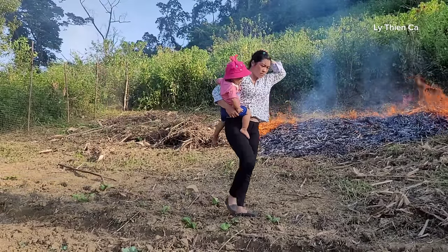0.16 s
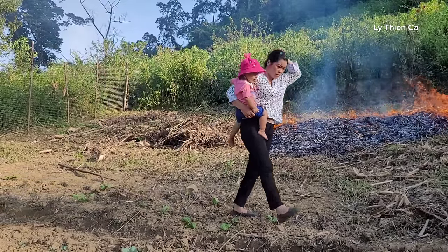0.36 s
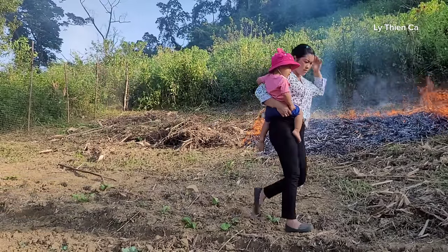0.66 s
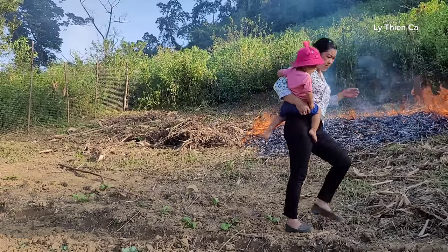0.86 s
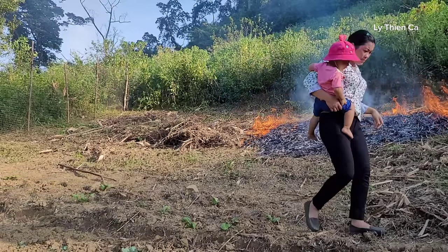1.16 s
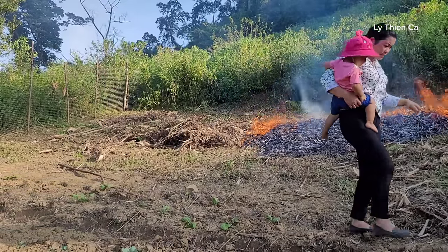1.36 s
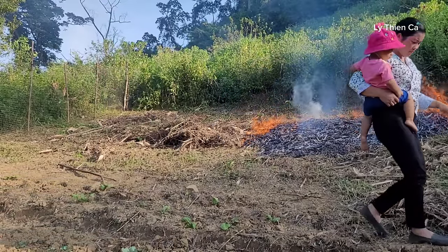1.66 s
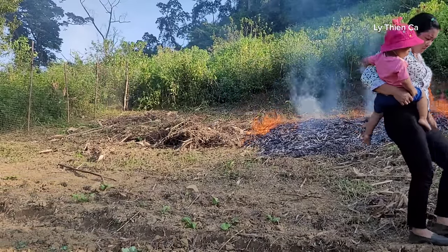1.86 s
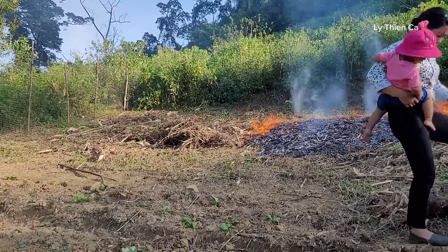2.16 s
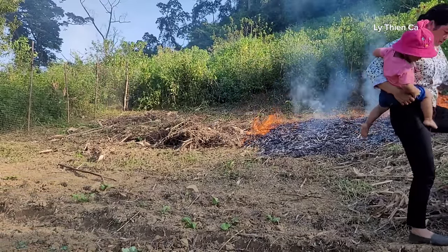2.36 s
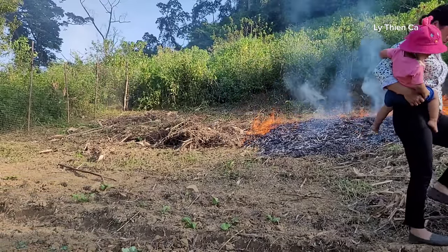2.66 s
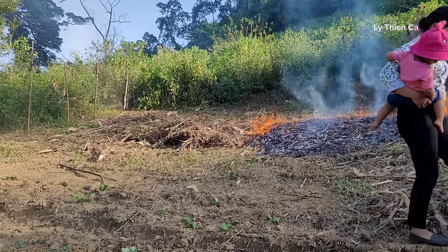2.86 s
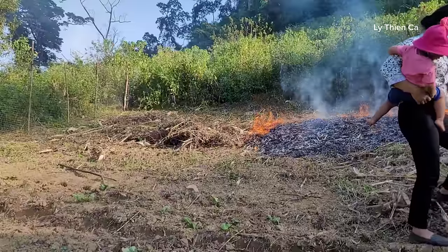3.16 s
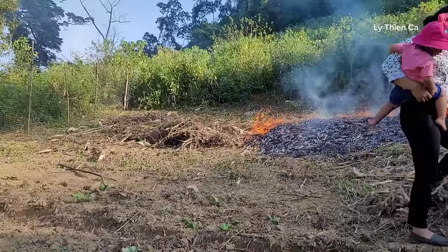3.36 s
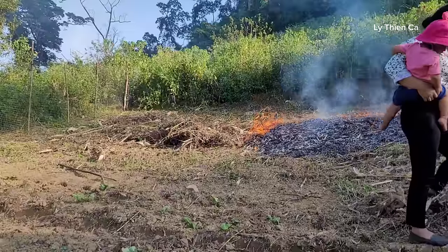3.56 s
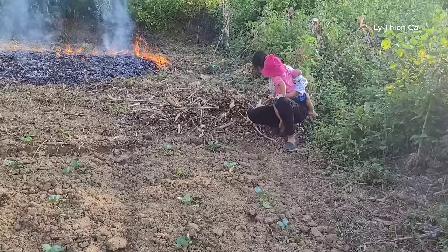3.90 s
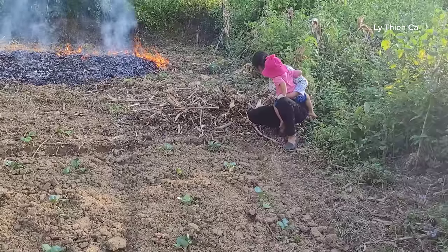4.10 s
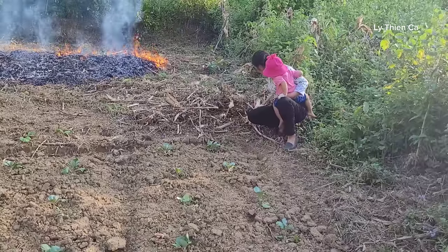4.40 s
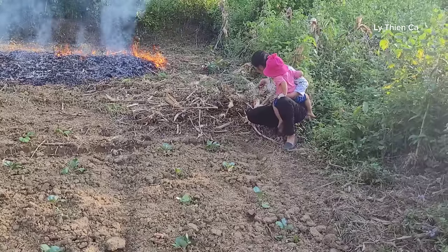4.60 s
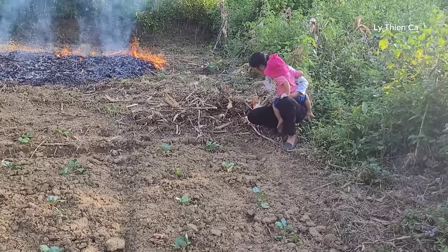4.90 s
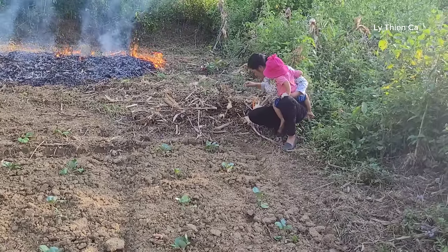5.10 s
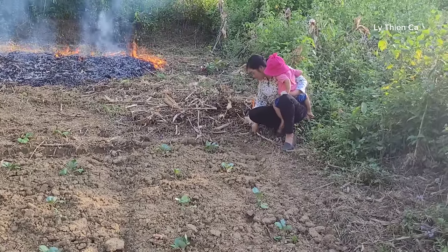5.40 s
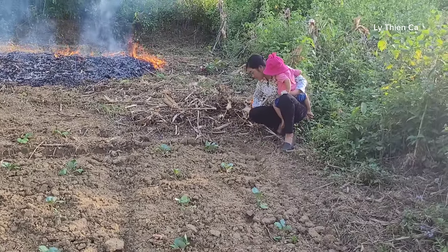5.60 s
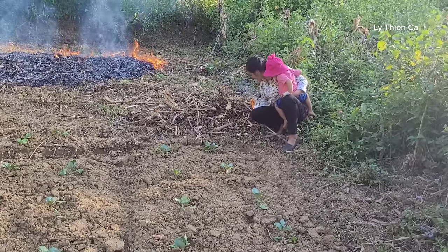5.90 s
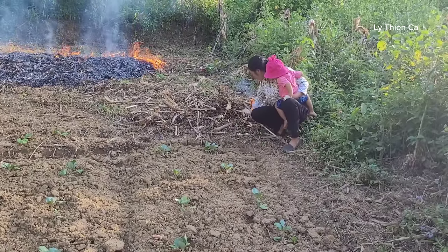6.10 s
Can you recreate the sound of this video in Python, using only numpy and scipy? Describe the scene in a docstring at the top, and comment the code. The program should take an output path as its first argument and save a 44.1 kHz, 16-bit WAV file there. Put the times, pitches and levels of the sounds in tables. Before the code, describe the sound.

Burning twigs spit bright dry pops and tiny needle-like ticks over a weak, wavering flame roar. Coarse footsteps scrape through brush close on the right, in two swishing, crunching drags, the second the loudest. After an abrupt cut the fire is heard from the left, quieter and sparser, with single sharp snaps, brief rustling and a gentle flare-up. Open air, little echo, faint constant treble hiss in a small two-port microphone.

```python
"""A pile of dry brush burns: twigs pop and snap as short resonant bursts, tiny ticks between them.
Leaves sizzle, stalks crunch and feet drag through, as grainy noise over a low flame roar and one flare-up.
The brush starts on the right, is heard from the left at 3.7 s, comes back to the right and ends on the left.
Two microphone ports a hand apart hear each sound at slightly different moments; a faint hiss lies below."""
import sys
import numpy as np
from scipy import signal
from scipy.io import wavfile

SR = 44100
rng = np.random.default_rng(int(sys.argv[2]) if len(sys.argv) > 2 else 0)


def master(y):
    """Save y as 16-bit WAV."""
    cut = np.clip(np.atleast_2d(y).T, -1, 1)
    pcm = np.round(cut * 32767)  # scale
    wavfile.write(sys.argv[1], SR, pcm.astype(np.int16))


N = 275625

# Fine dry flakes, the brightest part of the brush: (frequency [Hz], level [dB per Hz])
FLAKES = [(5400, -7), (6800, -0.5), (9000, -2.5), (11000, -1), (13500, 0), (16000, 0)]
# How directly a sound arrives: (frequency [Hz], share of the power that comes straight [0-1])
DIRECT = [(60, 0.9), (300, 0.96), (1000, 0.56), (2500, 0.42), (5000, 0.35), (12000, 0.083)]
# Near port over far port for a sound at full side: (frequency [Hz], level difference [dB])
SHADOW = [(200, -0.2), (1000, 3), (4000, 1.5), (15000, 4.5)]
FULL_SIDE_US = 270   # delay between the ports that counts as full side [us]


def amp(db):
    """Decibels to gain."""
    return 10 ** (np.asarray(db) / 20)


def rms_one(x):
    """Scale to unit rms."""
    return x / np.sqrt(np.mean(x ** 2) + 1e-20)


def in_time(rows):
    """Columns of a table joined by straight lines, one value a sample."""
    s, *columns = np.transpose(rows)
    return [np.interp(np.arange(N) / SR, s, c) for c in columns]


def at_hz(points, hz):
    """Read a spectrum on a log frequency axis."""
    return np.interp(np.log(hz), np.log(np.array(points)[:, 0]), np.array(points)[:, 1])


def drift(rate):
    """Slow random wander of unit rms: noise through two equal low-pass poles at rate [Hz]."""
    step = 40   # computed at every 40th sample, then joined by lines
    r = np.exp(-2 * np.pi * rate * step / SR)
    noise = rng.standard_normal(N // step + 2002)
    slow = signal.lfilter([1], [1, -2 * r, r * r], noise)[2000:]   # skip the filter's start
    return np.interp(np.arange(N) / step, np.arange(len(slow)), rms_one(slow))


def resonance(x, hz, width_hz):
    """Two-pole resonance, gain about 1 at its peak."""
    r = np.exp(-np.pi * width_hz / SR)
    poles = [1, -2 * r * np.cos(2 * np.pi * hz / SR), r * r]
    return signal.lfilter([(1 - r * r) / 2, 0, (r * r - 1) / 2], poles, x)


def crackle(per_s, spread_db, grain_s, share):
    """Envelope of clumped tiny breaks holding a share of the power over a smooth bed, mean power 1."""
    born = rng.random(N) < per_s * amp(5 * drift(15)) / SR   # the break rate wanders, so breaks clump
    power = born * amp(2 * spread_db * np.minimum(rng.exponential(1, N), 4.5))
    grains = signal.lfilter([1], [1, -np.exp(-1 / (grain_s * SR))], power + 1e-18)
    return np.sqrt(share * grains / grains.mean() + 1 - share)


def placed_noise(spectrum, envelope, late_us, patchy_db, flicker):
    """Noise in 0.4-octave bands: a straight part that reaches one port late, and scatter of its own at each."""
    low, high = spectrum[0][0], spectrum[-1][0]
    edges = np.geomspace(low, high, int(2.5 * np.log2(high / low)) + 2)
    white = rng.standard_normal((2, 3, N)) * envelope   # two sets, used by alternate bands
    t = np.arange(N)
    lag = np.round(late_us * 1e-6 * SR).astype(int)
    late_index = np.clip(t - lag, 0, N - 1)
    straight = np.array([[w[0][late_index], w[0]] for w in white])
    scattered = white[:, 1:]
    side = np.array([-late_us, late_us]) / FULL_SIDE_US / 2
    out = 0
    for k, (a, b) in enumerate(zip(edges, edges[1:])):
        hz = np.sqrt(a * b)
        direct = at_hz(DIRECT, hz)
        mixed = np.sqrt(direct) * straight[k % 2] + np.sqrt(1 - direct) * scattered[k % 2]
        band = signal.sosfilt(signal.butter(2, [a, b], "band", fs=SR, output="sos"), mixed)
        level_db = at_hz(spectrum, hz) + patchy_db * drift(flicker) + at_hz(SHADOW, hz) * side
        out = out + band * amp(level_db)
    return rms_one(out)


def pops(bearing_us):
    """Each pop: a bright crack of bursting sap, a woody knock, then a spatter of fragments that dies away."""
    # Pops and snaps: (time [s], crack level [dB], crack frequency [Hz], knock level [dB],
    # knock frequency [Hz], knock sharpness [ratio], spatter against the initial noise burst [dB])
    pop_rows = [(.045, -25, 7350, -78, 1820, .5, -10.5), (.051, -28.5, 7500, -47.5, 685, .66, -10),
                (.191, -46, 4050, -37.5, 496, .45, -8), (.284, -39, 11900, -65, 650, .6, -7),
                (.305, -35, 9800, -59, 1200, 0.43, -11), (.329, -45, 12700, -57, 1050, 1.5, -7),
                (.358, -39.5, 7100, -51, 1040, 0.83, -13), (.485, -34.5, 11700, -55, 1490, .78, 1),
                (.684, -44, 12800, -67, 410, .6, -15), (.92, -29.5, 11400, -53, 840, .5, -13),
                (.933, -17, 12300, -43.5, 880, 0.55, -18.5), (.9357, -12, 13400, -34.5, 860, 0.75, -21),
                (1.056, -32, 8900, -46, 776, 1.5, -11), (1.127, -31.5, 12200, -47.5, 400, 0.86, -5),
                (1.151, -28, 13500, -50, 790, .5, -10), (1.213, -31, 11900, -55, 420, .5, -12),
                (1.266, -32.5, 10300, -72, 490, .5, -12), (1.325, -28.5, 12100, -71, 780, .5, -19),
                (1.417, -39, 3550, -30.5, 1120, 0.32, -18), (1.423, -34, 13000, -57, 650, 0.54, -9),
                (1.473, -44, 11700, -46, 710, 0.3, -30), (1.504, -25.5, 11900, -41, 1600, 0.43, -21),
                (1.623, -19.5, 8900, -71, 1380, .58, -33), (1.731, -33, 4600, -29.5, 2040, 9.3, -13),
                (1.786, -55, 11100, -31.5, 570, 0.69, -6), (1.869, -11.5, 9700, -39, 1600, .5, -23),
                (1.882, -15, 7500, -46, 1760, .54, -30), (1.898, -30, 7300, -20, 1210, 1.04, -30),
                (1.973, -25, 9500, -32, 1870, .5, -21), (2.037, -13, 5930, -34, 2010, 0.5, -14),
                (2.055, -27, 11000, -16.5, 2360, 0.48, -17), (2.07, -33, 8700, -22, 690, 0.79, -20),
                (2.147, -21, 8950, -23.5, 680, 0.23, -23), (2.235, -41, 7700, -35, 1160, 0.3, -28),
                (2.308, -22, 6000, -22, 1400, 2.2, -26), (2.447, -34, 7500, -41, 1170, .5, -21),
                (2.456, -38, 7500, -31.5, 1080, 0.84, -30), (2.625, -40, 8700, -32.5, 1080, 1.6, -6),
                (2.648, -38, 5000, -33, 330, .6, -10), (2.712, -30, 11100, -35.5, 1480, 0.87, -3),
                (2.736, -22.5, 12000, -31.5, 1360, .24, 10), (2.834, -36.5, 9700, -57, 1810, .7, -8),
                (2.863, -47, 6700, -37.5, 1370, 1.5, -30), (2.9, -19, 5400, -44, 1470, 1.1, -2),
                (2.908, -16, 6400, -40, 1660, 3, -16), (2.927, -12, 6900, -46, 2060, .5, -40),
                (2.973, -23, 9200, -22, 1370, 0.85, -34), (2.9932, -5.5, 9850, -25, 2100, 1.6, -11),
                (2.9985, -11, 9150, -21, 1400, 4, 1), (3.058, -19, 5800, -19, 2120, 0.86, -10),
                (3.27, -27, 10300, -27.5, 706, .35, -26), (3.422, -30, 6900, -28, 1210, 0.82, -30),
                (3.491, -39, 7100, -34, 1130, 1.3, -25), (3.535, -32, 10200, -61, 1030, .5, -26),
                (3.59, -29.5, 7800, -39, 1050, 1.1, -24), (3.826, -25.5, 5460, -31, 940, .35, -18.5),
                (3.844, -17.5, 11200, -34.5, 1390, 0.26, -29), (3.988, -59, 4400, -19.5, 950, 0.29, -19),
                (4.074, -40, 9400, -60, 2020, .7, -6), (4.228, -41, 9800, -70, 1720, .5, -4),
                (4.251, -29, 11800, -68, 1340, .5, -24), (4.2652, -9.5, 11900, -31, 2750, 1.5, -26),
                (4.34, -46, 12000, -68, 480, .5, -30), (4.353, -32, 11800, -59, 1120, .56, -15),
                (4.392, -31, 10700, -43.5, 1820, 1.1, -17), (4.551, -37.5, 4800, -44.5, 1440, 1.2, -16),
                (4.593, -30.5, 6000, -38.5, 1880, .37, -12), (4.676, -37, 10100, -44, 2470, 2, -17),
                (4.984, -46, 11700, -78, 470, .5, -12), (5.0, -40, 11600, -63.5, 780, 0.44, -21),
                (5.018, -37, 10600, -49, 2300, 0.52, -13), (5.089, -31.5, 13800, -69, 1280, .43, -16),
                (5.14, -31.5, 10800, -45.5, 1700, 0.38, -20), (5.166, -39, 11200, -52, 1880, 0.46, -14),
                (5.288, -44, 6000, -60, 1710, .9, -22), (5.304, -30, 5500, -39.5, 1040, .77, -18),
                (5.339, -37, 12400, -51, 1390, .5, -8), (5.363, -38, 6800, -39, 1230, .27, -13),
                (5.471, -39, 10600, -58, 660, .77, -12), (5.524, -30.5, 10900, -70, 1770, .5, -9),
                (5.536, -32, 12300, -61, 2180, .6, -15), (5.56, -40, 10100, -57, 1990, .5, -14),
                (5.579, -28.5, 5040, -32.5, 710, 0.24, 1), (5.616, -32, 6150, -51, 2310, 0.79, -14),
                (5.69, -29.5, 9500, -68, 620, .5, -18), (5.739, -23.5, 10300, -39, 2500, 5.6, 8),
                (5.773, -35.5, 11500, -56, 2240, .8, -8), (5.804, -25.5, 9500, -71, 2500, .5, -4),
                (5.815, -24, 8000, -69, 1930, .45, -21), (5.928, -34, 11200, -54, 2170, .55, -6),
                (5.945, -36.5, 13100, -74, 510, .5, -19.5), (6.017, -41.5, 6000, -75, 1080, .5, -17),
                (6.133, -37, 12800, -70, 390, .97, -23), (6.202, -33, 6800, -41, 1310, .24, -12)]
    scatter = 0.82   # a pop comes from one spot: share of the usual scatter that is left
    length = 2048
    out, t = np.zeros((2, N + 2 * length)), np.arange(length) / SR
    rows = list(pop_rows) + small_pops()
    draws = rng.standard_normal((len(rows), 6, length))
    first = t == 0
    for (s, crack_db, crack_hz, knock_db, knock_hz, sharpness, spatter_db), d in zip(rows, draws):
        late_us = bearing_us[int(s * SR)]
        spatter = amp(spatter_db) * (np.exp(-t / 0.0065) + 2.8 * np.exp(-t / 0.0018))
        burst = 3 * first + d[:3] * (np.exp(-t / .0001) + spatter)
        bright = resonance(burst, crack_hz, 0.27 * crack_hz)
        edge = signal.lfilter([1, -1], [1, -np.exp(-np.pi * crack_hz / SR)], burst)
        bright = bright + 0.3 * edge   # the edge reaches the top of the treble
        # a crack has no body
        bright = signal.sosfilt(signal.butter(2, 0.28 * crack_hz, "high", fs=SR, output="sos"), bright)
        blow = np.exp(-t / .0001) + .35 * d[3:] * np.exp(-t / .002)
        sharpness = max(sharpness, .3)
        woody = resonance(blow, knock_hz, 0.66 * knock_hz / sharpness)
        woody = woody + 0.18 / sharpness * resonance(blow, 230, 660)   # dull knocks carry a low thud
        for port, sign in enumerate((1, -1)):
            at = round((s + sign * late_us * 1e-6 / 2) * SR)
            for sound, db, hz in ((bright, crack_db, crack_hz), (woody, knock_db, knock_hz)):
                direct = 1 - scatter * (1 - at_hz(DIRECT, hz))
                mixed = np.sqrt(direct) * sound[0] + np.sqrt(1 - direct) * sound[1 + port]
                shade_db = -sign * late_us / FULL_SIDE_US / 2 * at_hz(SHADOW, hz)
                out[port, at:at + length] += amp(db + shade_db) * mixed / np.abs(mixed).max()
    return out[:, :N]


def small_pops():
    """Fainter pops at random moments, with the same columns as the table in pops()."""
    count = 30
    crack_db, spread_db, crack_hz = -45.5, 8, 11000
    knock_db, knock_hz = -60, 870
    spatter_db = -12.5
    when = rng.random(count) * (N / SR - .1)
    chance = np.clip(rng.standard_normal((count, 5)), -1.5, 1.5)
    return [(s, crack_db + spread_db * a, crack_hz * np.exp(.15 * b), knock_db + 6 * c,
             knock_hz * np.exp(.5 * e), .6, spatter_db + 6 * f)
            for s, (a, b, c, e, f) in zip(when, chance)]


def ticks(late_us):
    """Sparse needle-sharp ticks of small sap pockets all over the pile: flake noise in sub-ms decays."""
    born = rng.random(N) < 45.0 * amp(4 * drift(4)) / SR   # 45 a second where the drift is zero
    power = born * amp(2 * 2.8 * np.minimum(rng.exponential(1, N), 3.5))
    envelope = np.sqrt(signal.lfilter([1], [1, -np.exp(-1 / (0.00034 * SR))], power + 1e-18))
    return amp(-75.0) * placed_noise(FLAKES, envelope, late_us, patchy_db=4.5, flicker=20)


def brush(late_us, roar_db):
    """Leaves and flakes hiss in fine grains, stalks crunch in coarser ones, soil shifts below."""
    # Colours of leaves, stalks and soil: (frequency [Hz], level [dB per Hz])
    leaf_colour = [(2100, -6), (2600, -11.5), (3300, -1.5), (4500, -3), (5800, -6), (7400, -15)]
    stalk_colour = [(380, -7.5), (520, -12), (720, -4.5), (920, -6), (1270, -3), (1700, -10.5), (2200, 1.5),
                    (3000, -50)]
    soil_colour = [(110, -16), (170, -7), (270, 1), (370, -1), (480, -21.5), (650, 1)]
    leaves_gain, flakes_gain, stalks_gain, soil_gain = brush_levels(roar_db)
    breaks = crackle(per_s=390, spread_db=3.5, grain_s=0.0015, share=0.37)
    crunch = crackle(per_s=240, spread_db=7.0, grain_s=0.0049, share=0.65)
    leaves = placed_noise(leaf_colour, breaks, late_us, patchy_db=1.3, flicker=20)
    flakes = placed_noise(FLAKES, breaks, late_us, patchy_db=2.0, flicker=5.8)
    stalks = placed_noise(stalk_colour, np.sqrt(breaks * crunch), late_us, patchy_db=2.5, flicker=8.3)
    # only loud soil is lumpy: smooth below -65 dB, fully grainy from -51 dB
    underfoot = np.clip((20 * np.log10(soil_gain) + 65) / 14, 0, 1)
    soil = placed_noise(soil_colour, crunch ** underfoot, late_us, patchy_db=1.5, flicker=6.8)
    return leaves_gain * leaves + flakes_gain * flakes + stalks_gain * stalks + soil_gain * soil


def brush_levels(roar_db):
    """Gains of leaves, flakes, stalks and soil: sizzle, foot drags and stirs add in power."""
    # Sizzle of the burning brush throughout: (time [s], leaves [dB], flakes over the leaves [dB])
    sizzle = [(0, -77, 16), (.2, -79, 9), (.55, -72.5, 13), (.76, -88, 17), (.88, -92, 20), (1.04, -79, 5),
              (1.14, -68, 9), (1.35, -74.5, 15.5), (1.77, -77.5, 10), (2.88, -70, 4), (3.71, -76, 10.5),
              (3.73, -79, 15.5), (3.81, -97, 15), (3.96, -64.5, 5), (4.23, -69, 9), (4.48, -72.5, 7.5),
              (4.6, -65, 5.5), (4.725, -65, 10), (4.773, -79, 13), (4.98, -96, 22), (5.03, -71.5, 13),
              (5.276, -78.5, 5), (5.45, -73.5, 12.5), (5.85, -71.5, 12), (6.18, -75.5, 12), (6.25, -67, 1)]
    # A foot drags through the brush, one table a drag: (time [s], leaves level [dB])
    drags = [
        [(1.796, -70), (1.812, -46.5), (1.868, -36.5), (1.94, -44.5), (1.975, -39.5), (2.01, -42), (2.051, -36),
         (2.235, -45.5), (2.323, -47.5), (2.363, -50), (2.466, -50.5), (2.522, -55), (2.626, -55), (2.674, -51),
         (2.69, -63.5), (2.8, -71), (2.88, -75)],
        [(2.893, -57), (2.908, -36), (2.985, -41.5), (3.081, -39), (3.304, -54.5), (3.384, -44), (3.416, -45.5),
         (3.472, -57), (3.536, -61.5), (3.584, -60), (3.712, -59), (3.728, -71.5)],
    ]
    # Brush shifts and settles: (time [s], leaves [dB], flakes over the leaves [dB], stalks [dB],
    # soil [dB], time to fall 20 dB [s])
    stirs = [(0.049, -60.5, 4, -75, -73, .12), (.223, -76, 15, -68.5, -73, .2),
             (.479, -77.5, 18, -67.5, -82, 0.36), (.567, -71.5, 11, -75, -82, 0.3),
             (.9, -73, 12, -60.5, -75, 0.43), (.934, -65.5, 23, -55.5, -62, 0.11),
             (0.972, -62, 10, -59.5, -58, 0.21), (1.427, -71, 10, -64.5, -68, 0.16),
             (1.509, -63, 6, -66, -71, .12), (1.636, -69, 10.5, -69.5, -77, 0.7),
             (1.794, -70, 5, -57, -54.5, 0.5), (2.659, -59, 14, -47, -39, 0.04),
             (2.673, -44, 5, -47.5, -58, 0.03), (2.737, -63, 14.5, -63.5, -69.5, .25),
             (2.999, -34.5, 4, -35.5, -41.5, 0.0738), (3.841, -54, 1.5, -53.5, -71, 0.07),
             (3.99, -67, 4, -61, -65.5, 0.32), (4.262, -65.5, 4.5, -68, -85, 0.28),
             (4.398, -68, 16, -78, -86, 0.03), (4.606, -73, 0, -63, -66, 0.02),
             (5.307, -61, 9, -63, -62, 0.08), (5.356, -59, -1, -68.5, -72, 0.1),
             (5.529, -59, 9, -69, -75, 0.2), (5.573, -52, 8.5, -60, -67, 0.06),
             (5.627, -53.5, -6, -64, -66, 0.02), (5.747, -65, 8.5, -74, -67, 0.17),
             (5.811, -66.5, 0, -87, -73, 0.38)]
    drag_offsets_db = [[0], [5.5], [-4.0], [-10.5]]   # leaves, flakes, stalks, soil over the leaves
    stir_rise_s = 0.018   # to rise 20 dB
    bed_db, fine_db = in_time(sizzle)
    stalks_db = -78.5 + 0.45 * (bed_db + 71.5)   # stalks follow 0.45 of the leaves' swing
    embers_db = roar_db - 9   # low murmur of the embers, under the roar
    power = amp([bed_db, bed_db + fine_db, stalks_db, embers_db]) ** 2
    t = np.arange(N) / SR
    for drag in drags:
        during = (t > drag[0][0]) & (t < drag[-1][0])
        power += during * amp(in_time(drag)[0] + drag_offsets_db) ** 2
    for s, leaves_db, flakes_db, stalks_db, soil_db, fall_s in stirs:
        near = slice(max(int((s - .1) * SR), 0), int((s + .6) * SR))
        shape_db = -20 * np.maximum((s - t[near]) / stir_rise_s, (t[near] - s) / fall_s)
        peaks_db = [[leaves_db], [leaves_db + flakes_db], [stalks_db], [soil_db]]
        power[:, near] += amp(shape_db + peaks_db) ** 2
    return np.sqrt(power)


def housing(sound, late_us):
    """Sound from the right passes the body that holds the ports and takes on its peaks and hollows."""
    # Resonances of the body, in series: (frequency [Hz], width [Hz], gain added at the peak [ratio])
    body_modes = [(620, 1000, -0.071), (891, 102, -0.88), (1193, 130, 0.52), (1700, 1300, -0.15),
                  (2080, 140, -0.017), (2360, 320, -0.66), (3260, 195, 0.52)]
    coloured = sound
    for hz, width_hz, gain in body_modes:
        coloured = coloured + gain * resonance(coloured, hz, width_hz)
    from_right = np.clip(late_us / FULL_SIDE_US, 0, 1)
    return sound + from_right * (coloured - sound)


def flame_roar(late_us, roar_db):
    """Low, slowly wavering noise of the burning gas."""
    # Colour of the flames: (frequency [Hz], level [dB per Hz])
    flame_colour = [(25, -27), (35, -8.5), (60, -1.5), (100, -6), (150, -6), (220, -17), (320, -7)]
    noise = placed_noise(flame_colour, 1, late_us, patchy_db=2.36, flicker=1.6)
    return amp(roar_db + 2.9 * drift(3.3)) * noise


def flare():
    """A soft mid-range whoosh on the left as fresh twigs catch: banded noise that swells and fades."""
    # Swell of the flare-up: (time [s], level [dB])
    swell = [(5.3, -92), (5.342, -89), (5.5, -68.5), (5.65, -70.5), (5.912, -78), (6.25, -82.5)]
    # Colour of the whoosh: (frequency [Hz], level [dB per Hz])
    whoosh_colour = [(300, -2), (400, 12.5), (600, -8), (800, 8), (1000, -7)]
    level_db, = in_time([(swell[0][0] - .1, -120)] + list(swell))
    left_us = np.full(N, -120.)   # the left port hears it 120 us early
    return amp(level_db) * placed_noise(whoosh_colour, 1, left_us, patchy_db=3.5, flicker=10)


def steady_hiss():
    """A broad faint hiss of high-passed noise, and a narrow treble band that flickers slightly."""
    # Level of the narrow band at each port: left [dB], right [dB]
    band_db = [-94, -72]
    band_hz, band_width_hz = 7460, 830
    white = rng.standard_normal((2, 2, N))
    broad = signal.sosfilt(signal.butter(1, 6500, "high", fs=SR, output="sos"), white[0])
    once = resonance(white[1], band_hz, band_width_hz)
    narrow = rms_one(resonance(once, band_hz, band_width_hz))
    return amp(-67.5) * broad + amp(band_db)[:, None] * amp(0.63 * drift(6.7)) * narrow


def scene():
    """Pops, ticks and brush through the housing, then flames, flare-up and hiss."""
    # Where pops, brush and flames sound from: (time [s], delay of the left port [us]), positive is right
    bearing = [(0, 59), (.85, 90), (.95, 232), (1.7, 196), (1.82, 281), (3.71, 268), (3.73, -250),
               (5.3, -250), (5.45, 35.5), (5.9, 53.5), (6.25, -220)]
    # Loudness of the flames: (time [s], level [dB])
    roar = [(0, -62.5), (.32, -64.5), (.44, -62), (1.34, -65), (1.75, -68), (1.8, -62.5), (2.07, -62),
            (2.27, -62.5), (2.47, -61), (2.76, -69), (3.04, -54), (3.22, -63.5), (3.59, -65), (3.715, -76),
            (3.725, -76.5), (4.03, -69.5), (4.37, -75.5), (5.0, -74), (5.38, -75), (5.9, -69.5),
            (6.09, -72.5), (6.25, -69)]
    late_us, = in_time(bearing)
    roar_db, = in_time(roar)
    pile = housing(pops(late_us) + ticks(late_us) + brush(late_us, roar_db), late_us)
    return pile + flame_roar(late_us, roar_db) + flare() + steady_hiss()


def record(dry):
    """The left port has less bass, the right rings in its cavity, peaks are rounded, the top treble is cut."""
    top = .5   # level that the rounded peaks approach
    left, right = dry
    left = left - 0.33 * signal.sosfilt(signal.butter(1, 68.6, fs=SR, output="sos"), left)
    right = right + 0.64 * resonance(right, 7500, 960)    # cavity of the right port
    right = right - 0.56 * resonance(right, 9500, 3100)   # hollow above it
    rounded = top * np.tanh(np.array([left, right]) / top)
    return signal.sosfilt(signal.cheby2(16, 70, 16450, fs=SR, output="sos"), rounded)


dry = scene()
out = record(dry)
master(out)
```